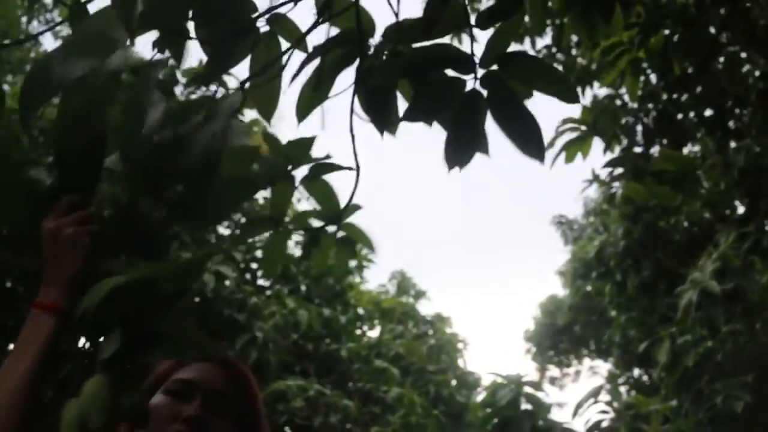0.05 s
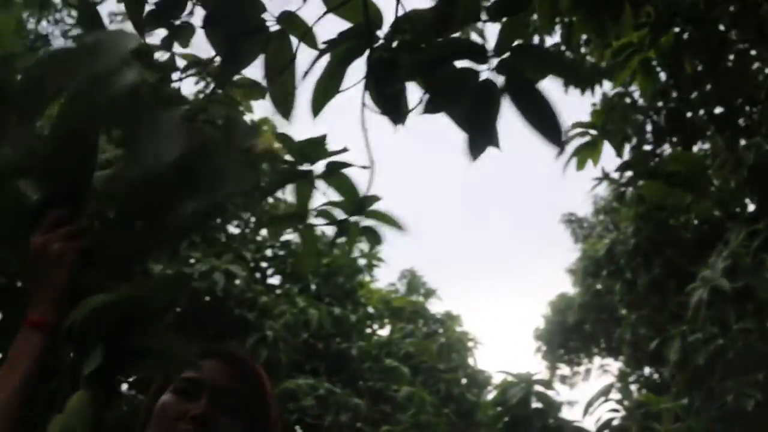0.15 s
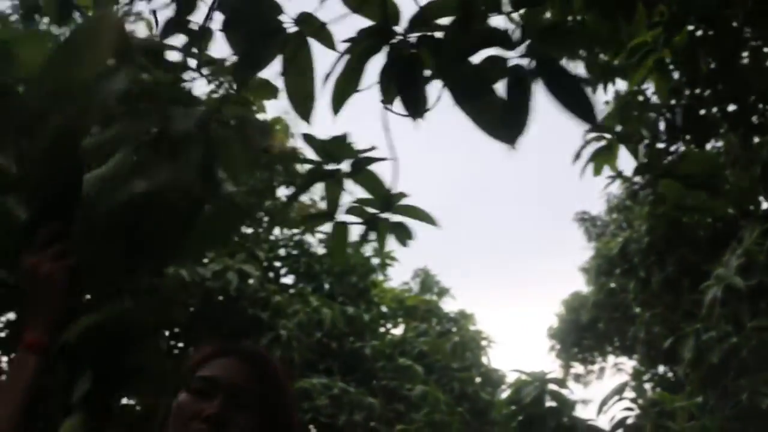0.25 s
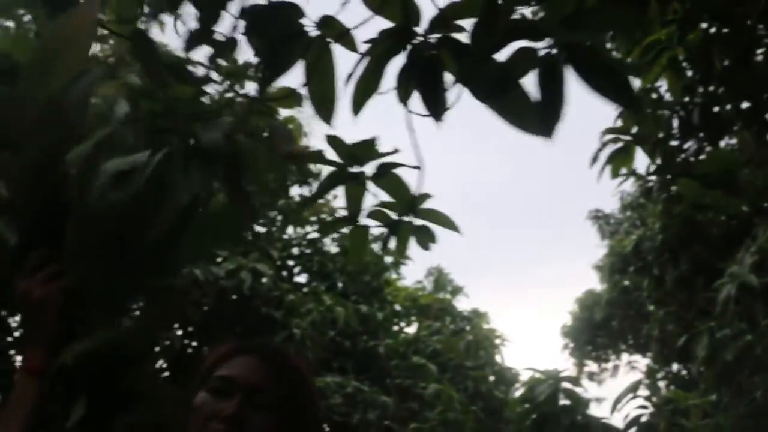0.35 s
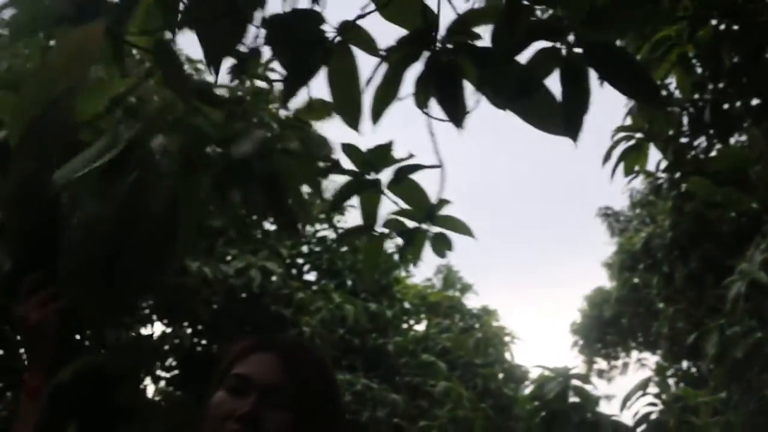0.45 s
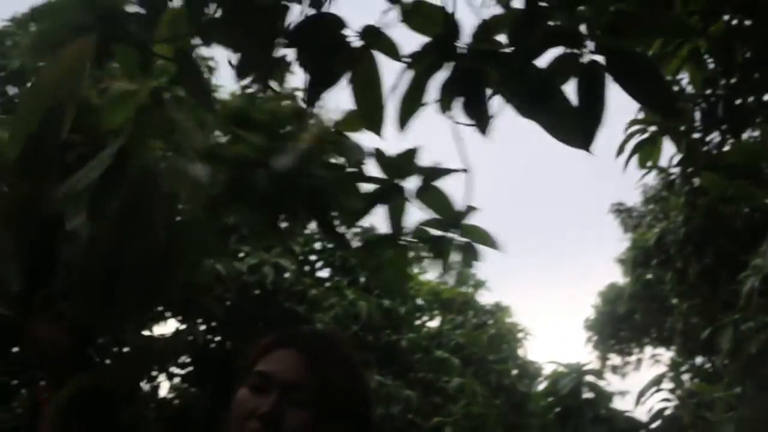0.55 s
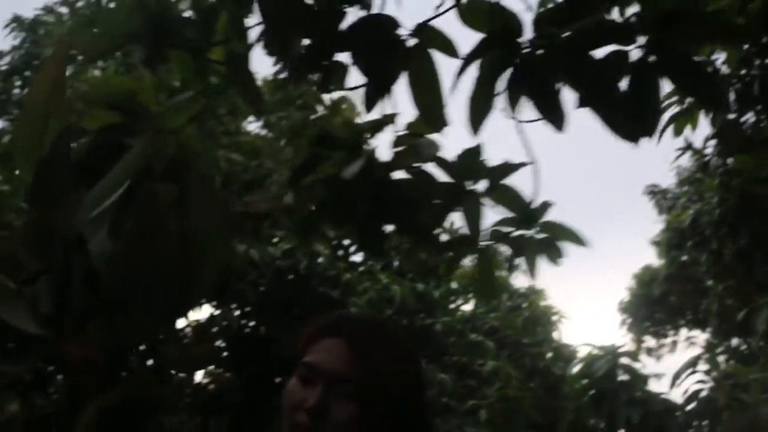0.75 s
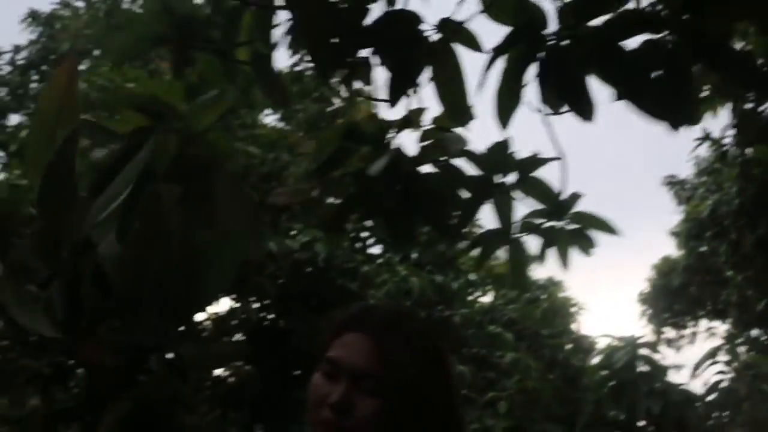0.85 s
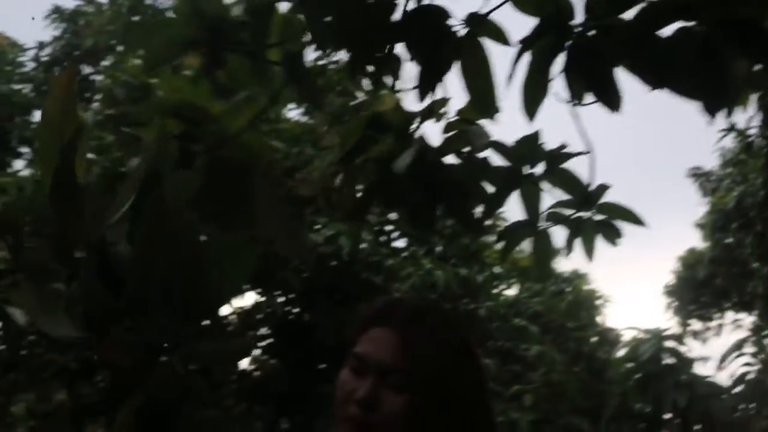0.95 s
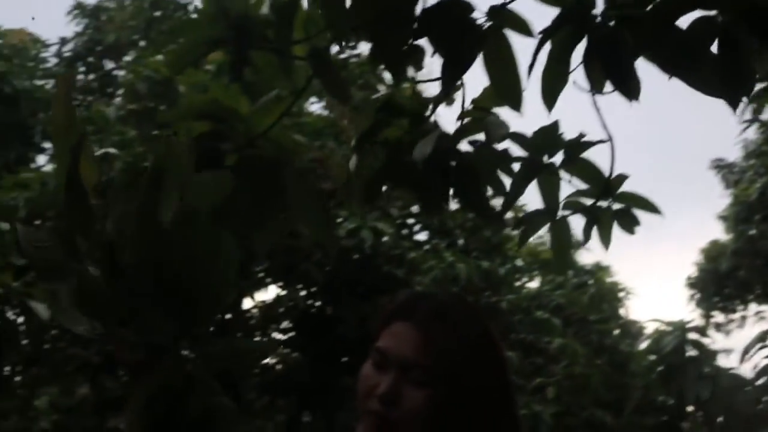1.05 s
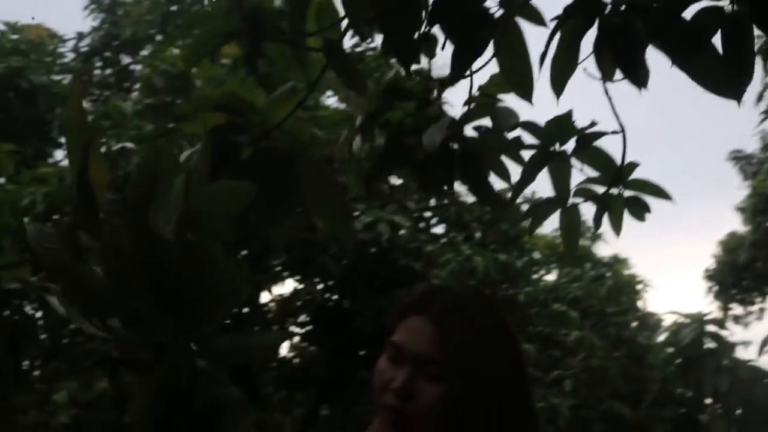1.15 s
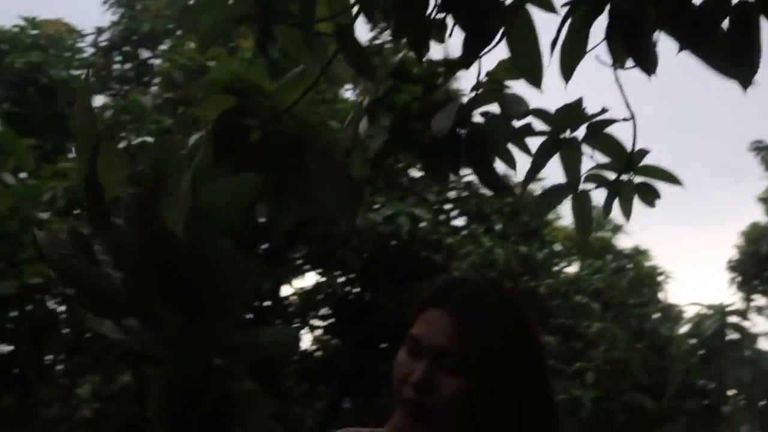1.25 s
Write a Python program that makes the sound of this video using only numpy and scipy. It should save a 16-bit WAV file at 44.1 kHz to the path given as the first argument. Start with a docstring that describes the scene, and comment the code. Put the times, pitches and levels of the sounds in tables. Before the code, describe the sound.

A branch snaps close by in a forest. Leaves rustle and twigs tick lightly from the start, then at about 0.25 seconds the wood tears and breaks with a sharp crack. Another strong twig click comes near 0.4 seconds. The rustle fades by 0.7 seconds, and scattered clicks thin out until about 1.3 seconds. A soft outdoor hiss and a low, distant drone continue throughout.

```python
"""A branch is pulled down close by in a forest: it strains, snaps and tears.
Sharp cracks set the wood ringing while its fibres rip in short bursts. Twigs and stiff leaves
click as the foliage springs back, and the rustle of leaves brushing together settles.
Leaves and trunks send back short echoes, over a soft outdoor hiss and a low, distant drone."""
import sys
import numpy as np
from scipy import signal
from scipy.fft import rfft, irfft
from scipy.io import wavfile

SR = 44100
rng = np.random.default_rng(int(sys.argv[2]) if len(sys.argv) > 2 else 0)


def to_wav(s):
    """Save 16-bit WAV."""
    ch = np.atleast_2d(s).T  # columns
    pcm = np.round(np.clip(ch, -1, 1) * 32767)  # PCM
    wavfile.write(sys.argv[1], SR, pcm.astype(np.int16))


N = 57330  # 1.3 seconds
CUTOFF_HZ = 15800


def amp(db):
    """Turns decibels into a number to multiply by."""
    return 10 ** (np.asarray(db) / 20)


def unit(x):
    """Scales a signal to an average strength (rms) of 1."""
    return x / np.sqrt(np.mean(x ** 2) + 1e-20)


def add(mix, start_s, sound):
    """Adds a sound to the mix at the given time."""
    part = mix[max(round(start_s * SR), 0):][:len(sound)]
    part += sound[:len(part)]


def lowpass(x, hz):
    """Gently dulls the sound above hz."""
    return signal.lfilter(*signal.butter(1, min(hz, .49 * SR), fs=SR), x)


def colour(x, tone, size=2048):
    """Shapes bass and treble to follow rows of (frequency_hz, level_db)."""
    hz, db = np.transpose(tone)
    bins_hz = abs(np.fft.fftfreq(size, 1 / SR)) + 1
    log_gain = np.log(amp(np.interp(np.log(bins_hz), np.log(hz), db)))
    response = np.exp(signal.hilbert(log_gain).conj())  # rings after a hit, never before
    taps = np.fft.ifft(response).real[:size // 2]
    return signal.fftconvolve(x, taps / np.linalg.norm(taps))[:len(x)]


def drift(seconds):
    """A smooth random wobble; more seconds make it slower."""
    hz = np.fft.rfftfreq(N, 1 / SR)
    keep_slow = np.exp(-(hz * seconds) ** 2) * (hz > 0)
    return unit(irfft(rfft(rng.standard_normal(N)) * keep_slow, N))


def grains(per_s, spread_db):
    """Tiny ticks of uneven size at random times."""
    size = amp(spread_db * np.minimum(rng.exponential(1, N), 5))
    return unit(size * rng.choice([-1, 1], N) * (rng.random(N) < per_s / SR))


# The tone of the outdoor air: frequency_hz, level_db
AIR_TONE = [(20, -22), (45, 2.5), (65, 1), (82, 8), (103, 6), (140, 3), (180, -4), (260, -5.5),
            (400, -11.5), (1000, -11.5), (2500, -16.5), (5000, -21.5), (9000, -24), (16000, -32.5)]
def outdoors(air_db=-44, drone_db=-50.5, drone_hz=62.95, waver=0.031, swell_db=1, drift_s=0.1):
    """Soft hiss and rumble with a wavering drone, perhaps a far engine."""
    air = unit(colour(rng.standard_normal(N), AIR_TONE, size=16384))
    pitch_hz = drone_hz * (1 + waver * drift(drift_s))
    cycles = np.cumsum(pitch_hz) / SR
    drone = unit(amp(swell_db * drift(drift_s)) * np.sin(2 * np.pi * cycles))
    return amp(air_db) * air + amp(drone_db) * drone


# How loud the rustle is as time passes: time_s, level_db
RUSTLE_LEVELS = [(0, -41.5), (.05, -47), (.12, -48.5), (0.149, -43), (0.194, -49.5), (.25, -37.5),
                 (.31, -43.5), (.37, -42), (.47, -44), (.51, -46.5), (0.552, -45), (.575, -50), (.61, -50),
                 (.66, -49), (.71, -65.5), (.77, -47), (.81, -61.5), (.88, -64), (.96, -55), (1.05, -75),
                 (1.142, -50), (1.18, -59.5), (1.3, -55.5)]
# The tone of leaves touching: frequency_hz, level_db
LEAF_TONE = [(100, -18.5), (400, -2), (1000, -2.5), (1900, 0), (2700, 1), (3800, -1), (5500, -6.5),
             (8000, -5), (11000, -10.5), (16000, -17.5)]
# Borders between the rustle's low and high bands: frequency_hz
LEAF_BORDERS_HZ = [700, 1300, 2200, 3200, 4500, 7000, 11000]
def leaves(clump_db=2, clump_s=0.0071, crackle_db=-3.5):
    """Leaves of many sizes brush together in short clumps, with a light crackle on top."""
    brush = np.zeros(N)
    borders = [100] + LEAF_BORDERS_HZ + [CUTOFF_HZ]
    for band in zip(borders, borders[1:]):
        touches = grains(per_s=6000, spread_db=3) * amp(clump_db * drift(clump_s))
        brush += signal.sosfilt(signal.butter(2, band, "bandpass", fs=SR, output="sos"), touches)
    crackle = amp(crackle_db) * grains(per_s=500, spread_db=3)
    level_db = np.interp(np.arange(N) / SR, *np.transpose(RUSTLE_LEVELS))
    return colour(unit(brush) + crackle, LEAF_TONE) * amp(level_db)


# The notes inside one click: pitch_multiple, level_db
TWIG_NOTES = [(.3, -16), (.58, -11), (1, 0), (1.3, -13), (2.6, -21)]
# Twig and stiff leaf clicks, plus the branch's second crack as the two rows at 0.372 s: start_s, level_db,
# pitch_hz, ring_cycles, edge_db, splinter_db
TWIG_CLICKS = [(0.024, -29.5, 3220, 4.5, -10, -16), (0.0764, -33, 8900, 4, -2, -3),
               (0.0878, -30, 8650, 6.6, -0.5, -5), (0.1333, -23, 3860, 3.2, -4, -2),
               (0.1813, -26.5, 2370, 2.1, -12, -18), (0.28, -15, 3030, 1.8, -3, -9),
               (0.2907, -19, 2760, 1.5, 8.5, -8), (0.3567, -21, 2750, 2, -4, -14),
               (.3720, -11.5, 3410, 4.2, -17, -8.5), (.3722, -8.5, 2350, 1.94, -7, -11),
               (0.3909, -19.5, 2840, 1.6, 8, -10), (.4256, -33, 3840, 2.7, 1, -3),
               (0.547, -30.5, 1090, 2, -5, -6), (0.578, -27, 1010, 1, -7, -15),
               (0.578, -25, 2800, 2.6, -4, -16), (0.593, -30, 3740, 7.2, -16, -11),
               (0.598, -26.5, 4070, 7.2, -12, -7), (0.5993, -26.5, 7320, 7, -16, -9),
               (0.6204, -34, 2600, 2, 3, -14), (0.6457, -23.5, 3310, 4.4, 6, -5),
               (0.6702, -18.5, 1350, 0.62, -17, -34), (0.7476, -21.5, 1710, 1.6, 1, -7),
               (0.7509, -23.5, 2760, 3, 0, -8.5), (0.7552, -23, 2600, 2.3, 10, -7),
               (0.766, -31, 2510, 8, -16, -16), (.8029, -39, 9000, 5.6, 2, -2),
               (0.83, -29, 3540, 2.3, -4, -10), (0.8389, -27.5, 3720, 2.4, -2, -8),
               (0.912, -39, 4200, 4, -4, -2), (0.9435, -20, 2510, 2.9, -3, -12.5),
               (1.0358, -39, 7640, 5, -2, 0), (1.0840, -26, 2280, 2.1, -16, -26),
               (1.2056, -33.5, 3740, 2.1, -4.5, 0.5), (1.2730, -39, 4630, 2.1, -4, 4.5)]
def twigs(edge_s=.00007, rise_s=.0001, splinter_s=0.0022, spray_db=-5.5):
    """Each click is a sharp edge, a quickly fading ring and a brief spray of splinters."""
    t = np.arange(SR // 20) / SR
    clicks, spray_level = np.zeros(N), np.zeros(N)
    edge = lowpass((1 - t / edge_s) * np.exp(-t / edge_s), hz=9000)
    for start_s, level_db, pitch_hz, ring_cycles, edge_db, splinter_db in TWIG_CLICKS:
        ring = sum((-1) ** k * amp(db) * np.sin(2 * np.pi * min(pitch_hz * multiple, SR / 2) * t)
                   for k, (multiple, db) in enumerate(TWIG_NOTES))
        fade = (1 - np.exp(-t / rise_s)) * np.exp(-t * pitch_hz / ring_cycles)
        click = ring * fade + amp(edge_db) * edge
        click -= lowpass(click, 0.36 * pitch_hz)  # thin out the bass
        add(clicks, start_s, amp(level_db) * click)
        add(spray_level, start_s, amp(level_db + splinter_db) * np.exp(-t / splinter_s))
    return clicks + amp(spray_db) * splinters(spray_level)


# The tone of splintering: frequency_hz, level_db
SPLINTER_TONE = [(500, -10.5), (2000, -1.5), (4500, 5), (9000, -1.5), (12000, -10.5), (16000, -11)]
def splinters(level):
    """Tiny splinters make a bright fizz that follows the given level."""
    return colour(level * grains(per_s=14000, spread_db=1.5), SPLINTER_TONE)


# Bursts of tearing: start_s, level_db, fade_ms, bass_db
FIBRE_TEARS = [(0.2107, -38, 8.2, -1), (0.2195, -27, 3.4, 0), (0.2235, -27.5, 2.7, -5), (.2363, -15, 6, -3),
               (0.2421, -22.5, 4.2, 2), (.2520, -23.5, 9.8, -5), (0.2635, -28.5, 16.8, -6),
               (.2790, -32, 8.9, -3)]
# The tone of tearing wood: frequency_hz, level_db
FIBRE_TONE = [(60, -24), (200, -7), (330, -5), (600, 0.5), (1000, -2.5), (2000, -8), (2800, 3.5),
              (4500, -0.5), (6000, -5), (8000, -5.5), (11000, -13), (16000, -23)]
def tearing_fibres(rise_s=0.00012, bass_hz=1210):
    """Wood fibres rip in bursts, each a dense shower of ticks."""
    t, fibres = np.arange(N) / SR, np.zeros(N)
    for start_s, level_db, fade_ms, bass_db in FIBRE_TEARS:
        fade = (1 - np.exp(-t / rise_s)) * np.exp(-t * 1000 / fade_ms)
        burst = amp(level_db) * fade * grains(per_s=14000, spread_db=3)
        bass_change = (amp(bass_db) - 1) * lowpass(burst, bass_hz)
        add(fibres, start_s, burst + bass_change)
    return colour(fibres, FIBRE_TONE)


# The cracks as the branch gives way: start_s, level_db, width_ms
BRANCH_CRACKS = [(0.2367, -8.5, .28), (.2368, -2, 0.11), (.2379, -4, 0.037), (0.242, -4.5, 0.23),
                 (0.2436, -10, 0.056)]
# The notes the wood rings with: pitch_hz, relative_level_db, ring_s (time to fade by 60 dB)
WOOD_NOTES = [(225, -1, .07), (385, -10.5, 0.085), (565, -1, .12), (777, -1.5, 0.052), (863, 0.5, 0.055),
              (1068, 2.5, 0.1), (1228, -11, 0.055), (1398, -4, .09), (1618, -2, 0.09), (1830, -1, 0.063),
              (2116, -7, .1), (2697, -3, 0.064), (2826, 2, .11), (3510, -3, .09), (4576, -7, 0.11)]
def snapping_branch(ring_db=-26, rise_s=0.0016):
    """The branch breaks in a few sharp steps; the first sets the wood ringing."""
    t, snap = np.arange(N) / SR, np.zeros(N)
    for start_s, level_db, width_ms in BRANCH_CRACKS:
        age = t * 1000 / width_ms
        add(snap, start_s, -amp(level_db) * (1 - age) * np.exp(-age))
    ring = sum((-1) ** k * amp(db - 60 * t / ring_s) * np.sin(2 * np.pi * pitch_hz * t)
               for k, (pitch_hz, db, ring_s) in enumerate(WOOD_NOTES))
    add(snap, BRANCH_CRACKS[0][0], amp(ring_db) * (1 - np.exp(-t / rise_s)) * ring)
    return lowpass(snap, hz=8000)


# Echoes from the trees: level_db, delay_s, ring_s (time to fade by 60 dB), treble_limit_hz
TREE_ECHOES = [(-10.5, .0008, 0.022, 10000), (-19.5, .008, .2, 6500)]
def forest(sound):
    """Near leaves and farther trunks add short, blurred echoes."""
    t, out = np.arange(SR // 2) / SR, sound.copy()
    for level_db, delay_s, ring_s, treble_limit_hz in TREE_ECHOES:
        tail = lowpass(rng.standard_normal(len(t)), treble_limit_hz) * amp(-60 * t / ring_s)
        add(out, delay_s, amp(level_db) * signal.fftconvolve(sound, tail / np.linalg.norm(tail)))
    return out


def scene():
    """Branch, twigs and leaves among the trees, in one channel."""
    nearby = tearing_fibres() + snapping_branch() + twigs() + leaves()
    return (forest(nearby) + outdoors())[None]


def record(dry):
    """Cuts away the very highest treble."""
    taps = signal.firwin(255, CUTOFF_HZ, window=("kaiser", 9), fs=SR)
    return signal.oaconvolve(dry, taps[None], "same")


dry = scene()
out = record(dry)
to_wav(out)
```